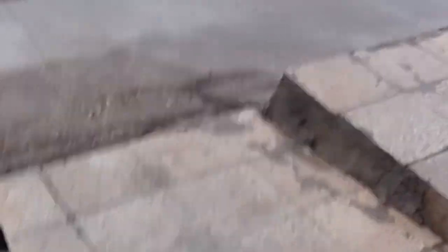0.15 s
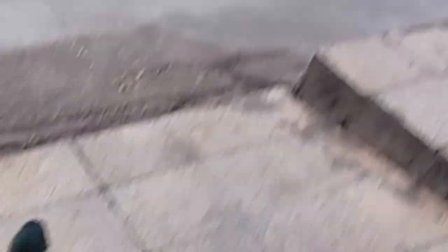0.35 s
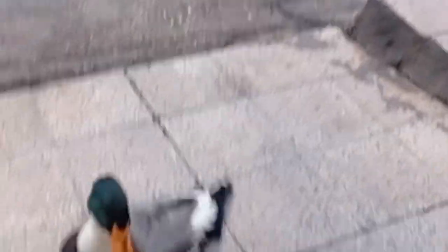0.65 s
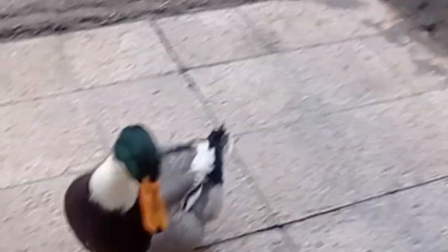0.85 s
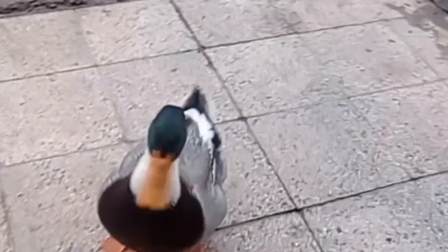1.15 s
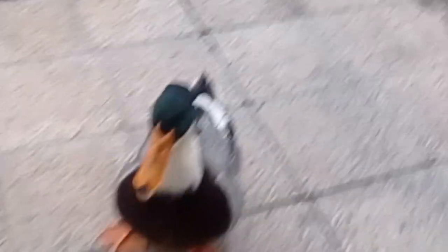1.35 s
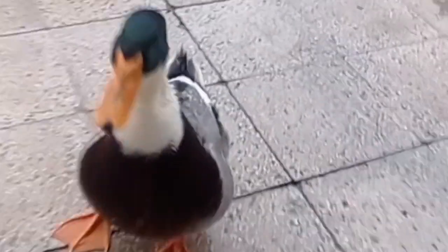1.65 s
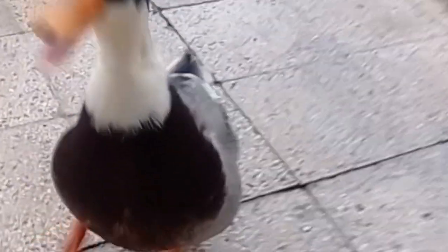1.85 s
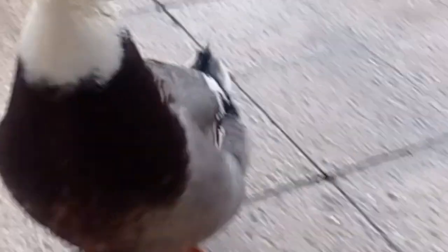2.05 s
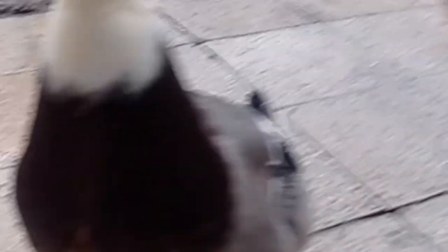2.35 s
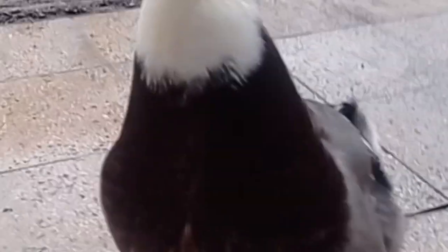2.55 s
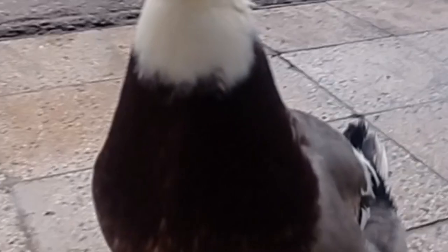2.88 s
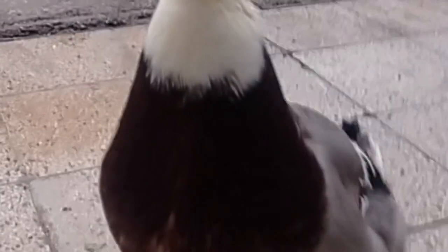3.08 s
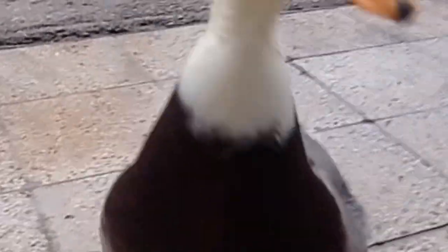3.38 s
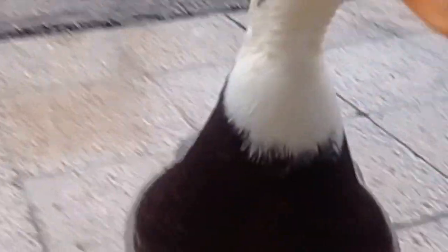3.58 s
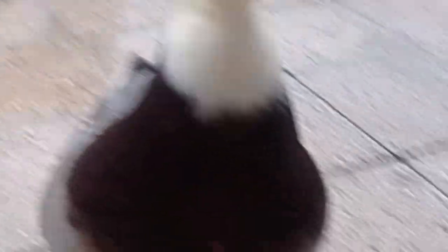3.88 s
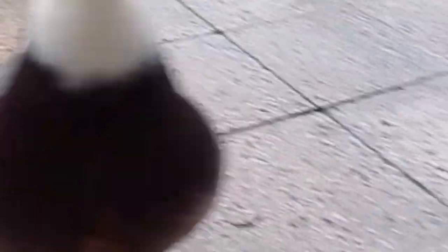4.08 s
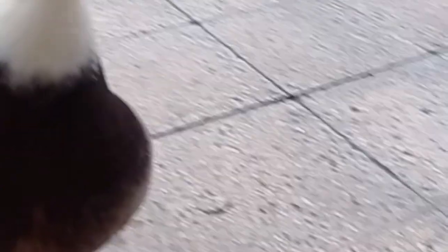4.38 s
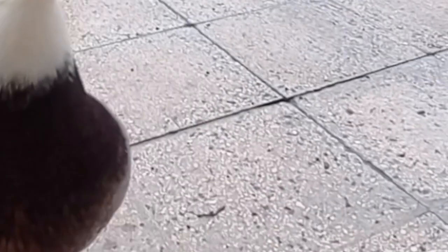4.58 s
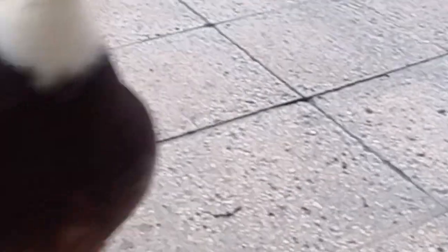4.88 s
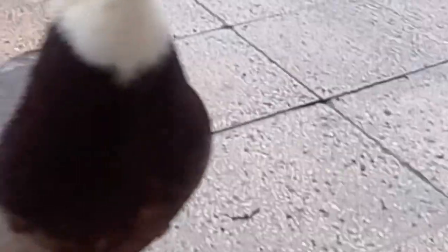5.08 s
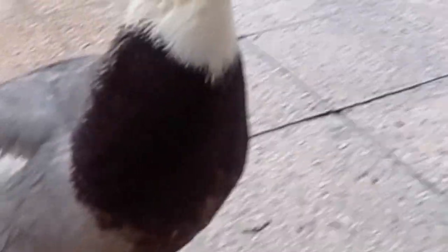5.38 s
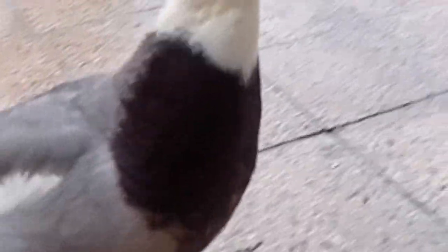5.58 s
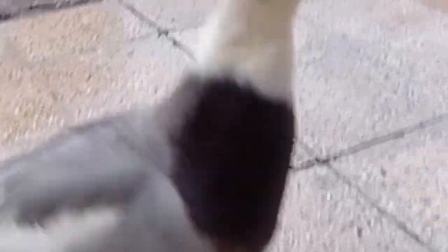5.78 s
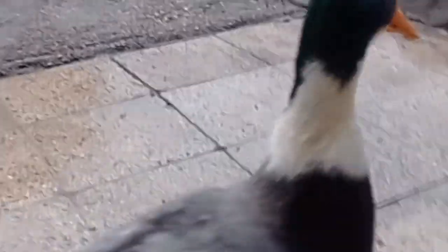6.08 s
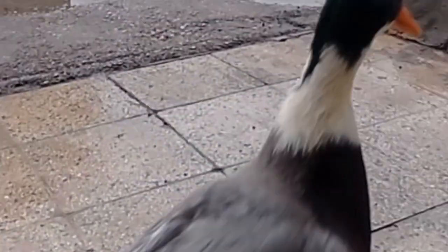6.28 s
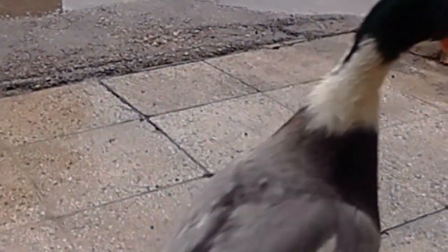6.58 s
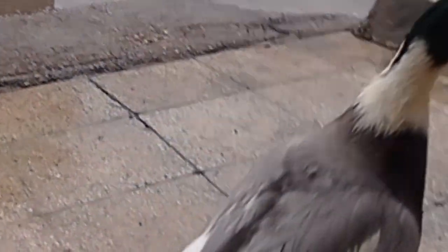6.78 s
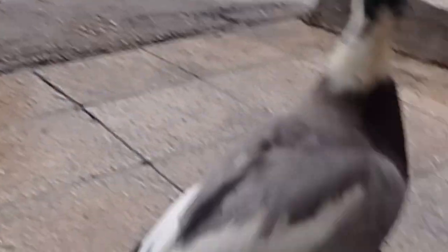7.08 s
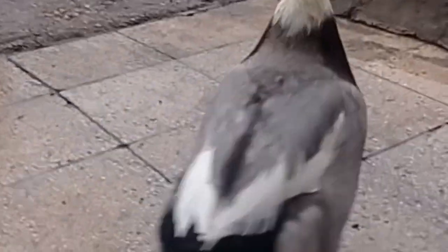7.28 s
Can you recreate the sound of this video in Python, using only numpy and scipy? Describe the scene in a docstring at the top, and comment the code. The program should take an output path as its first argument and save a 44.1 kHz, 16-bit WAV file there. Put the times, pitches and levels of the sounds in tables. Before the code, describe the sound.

A drake rasps short, reedy quacks right up at a hand-held microphone on a paved street, with handling thuds and rumble underneath.

```python
"""Drake quacking in a street

A drake walks up to a hand-held microphone on a paved street, rasping short quacks, many in pairs, then turns away.
Each quack is a reed tone and noise swelling some 60 to 100 times a second, filtered by throat and bill resonances.
Decaying noise makes the bill's wet smacks and light ticks; rumble, rubbing and thuds come from the hand.
Shaped noise gives scuffs, street and a soft high hiss; gliding sines give a far bird; house fronts echo the animals."""
import sys
import numpy as np
from scipy import signal
from scipy.fft import rfft, irfft
from scipy.io import wavfile
from scipy.ndimage import uniform_filter1d, map_coordinates

SR = 44100
rng = np.random.default_rng(int(sys.argv[2]) if len(sys.argv) > 2 else 0)


def output_pcm(signal):
    """Save a mono or channel-first signal as 16-bit PCM at the path in sys.argv[1].

    Samples are clipped to [-1, 1] before scaling.
    """
    pcm = np.clip(np.atleast_2d(signal).T, -1, 1) * 32767
    wavfile.write(sys.argv[1], SR, np.round(pcm).astype(np.int16))


N = 328306
TIME = np.arange(N) / SR
CUTOFF_HZ = 15900   # top of the microphone's band

# Most sources add a trim to their table levels; scuffs and the quack body use theirs directly.
# High hiss that comes and goes: (time [s], level [dB])
HISS_LEVEL = [(0, -66), (.49, -81), (.67, -74), (.76, -63), (1.0, -60), (1.24, -77), (1.4, -64),
              (1.83, -68), (2.2, -60), (2.55, -68), (2.95, -80), (3.45, -87), (4.22, -88), (4.32, -70),
              (4.73, -72), (5.12, -63), (5.4, -84), (7.44, -94)]
# Spectrum of the hiss: (frequency [Hz], level [dB])
HISS_SPECTRUM = [(2000, -14.5), (3400, -13), (5000, -16), (5800, -6), (6700, -5.5), (7600, -10),
                 (9000, -21.5), (10200, -28.5), (13000, -36), (15200, -28)]
# Spectrum of far street noise: (frequency [Hz], level [dB])
STREET_SPECTRUM = [(120, -17.5), (200, -11), (330, -3), (660, -10.5), (1000, -9), (1600, -13.5),
                   (2100, -24.5), (2800, -31.5), (4800, -35), (6000, -38.5), (10000, -52.5), (16000, -62)]

# Hand moving on the case: (time [s], rumble level [dB], rubbing relative to rumble [dB])
HANDLING_LEVEL = [(0.0, -48, 4), (0.04, -46.5, -26), (0.5, -33.5, -11), (0.56, -47.5, -14),
                  (0.66, -36.5, -20), (1.18, -41.5, -17.5), (1.24, -35.5, -10), (1.3, -37.5, -28.5),
                  (1.82, -27, -13), (2.3, -50.5, -11.5), (2.78, -42.5, -10), (2.84, -30, -8.5),
                  (3.29, -45.5, -14.5), (3.56, -30.5, -13), (3.81, -52, -9.5), (3.98, -39, -21.5),
                  (4.25, -46, -24), (4.33, -59.5, -4), (4.66, -44, -19), (5.86, -44, -19), (5.99, -52, -12),
                  (6.98, -40.5, -19.5), (7.27, -55.5, -10.5), (7.44, -45, -22)]
# Hand bumping the microphone: (time [s], thud level [dB], knock relative to thud [dB])
HAND_BUMPS = [(0.128, -29.5, -25), (0.277, -19, -19), (0.444, -19.5, -23), (0.473, -15, -17.5),
              (0.607, -23, -38), (0.739, -20.5, -41), (0.888, -25, -13), (1.223, -16.5, -16),
              (1.237, -14, -28), (1.743, -19.5, -38), (1.775, -20, -28), (1.818, -19.5, -16),
              (1.885, -20, -15), (1.959, -18.5, -12), (2.835, -16, -36), (2.931, -15, -8),
              (3.023, -20.5, -21), (3.057, -17.5, -12.5), (5.652, -29, -24.5), (6.458, -25, -30.5),
              (6.571, -26, -36), (6.891, -23, -47), (6.956, -27, -24), (7.028, -27.5, -37)]
# Spectra of rumble, rubbing and knock: (frequency [Hz], level [dB])
RUMBLE_SPECTRUM = [(30, -19.5), (45, -13.5), (66, 2.5), (100, 3), (150, 3.5), (220, -8), (300, -21)]
RUB_SPECTRUM = [(180, -13.5), (270, 4), (400, -6.5), (600, -20), (900, -22.5), (1500, -28)]
KNOCK_SPECTRUM = [(250, -0.5), (450, -1.0), (750, -16.0)]

# Quacks: (time of first beat [s], length [s], attack [s], level [dB], sag over the call [dB], rasp level [dB],
#          edge level [dB], beat rate [1/s], nominal reed pitch [Hz], mouth resonance [Hz]);
# rasp and edge levels are relative to the body
QUACK_EVENTS = [(0.008, 0.096, 0.005, -42.5, 6, -9.5, -4, 89, 1840, 1700),
                (0.274, 0.1, 0.041, -37, 9.5, -6.5, -6, 68, 1840, 1640),
                (0.358, 0.11, 0.047, -39, 4.5, -18.5, -12.5, 61, 1788, 1630),
                (0.537, 0.097, 0.038, -34.5, 7, -7, -10.5, 83, 1776, 1650),
                (0.953, 0.093, 0.033, -39, 2, -10.5, -11, 77, 1824, 1710),
                (1.097, 0.1, 0.063, -36.5, 1.5, -8, -3.5, 88, 1829, 1720),
                (1.442, 0.11, 0.04, -34, 1.5, -8, -8, 81, 1788, 1680),
                (1.591, 0.093, 0.088, -25.5, 1.5, -5, -4.5, 102, 1786, 1750),
                (1.864, 0.11, 0.032, -27.5, 5, -12.0, -8, 75, 1683, 1720.0),
                (1.98, 0.12, 0.058, -25, -0.5, -8.5, -5.5, 91, 1812, 1764),
                (2.26, 0.1, 0.031, -25, 1, -13.5, -7, 83, 1844, 1725),
                (2.367, 0.13, 0.049, -24.5, 0.0, -13.5, -4.5, 87, 1790, 1785),
                (2.651, 0.22, 0.029, -25, 2, -18.5, -13, 82.5, 1921, 1735),
                (2.824, 0.087, 0.081, -18.5, 1, -13.5, -7, 97, 1883, 1720),
                (3.112, 0.19, 0.024, -32.5, -4, -20.5, -13, 78, 1812, 1620),
                (3.551, 0.094, 0.048, -28.5, -3.5, -18, -11.5, 91.0, 1733, 1630),
                (3.676, 0.1, 0.06, -28, -4.5, -16.5, -8.5, 90, 1804, 1670),
                (4.004, 0.171, 0.065, -23.5, 13.5, -12, -15.5, 66, 1825, 1615),
                (4.371, 0.09, 0.025, -29.5, 0.5, -15.5, -11.5, 76.0, 1833, 1540),
                (4.518, 0.11, 0.036, -28, 0.5, -15, -13.5, 86.5, 1815, 1610.0),
                (4.829, 0.17, 0.024, -30, 0, -16.5, -18, 81, 1820, 1590),
                (5.205, 0.09, 0.036, -27.5, 3.5, -16.5, -20, 77, 1889, 1590),
                (5.326, 0.103, 0.059, -31, 0.0, -15.5, -10, 84, 1793, 1570.0),
                (5.743, 0.19, 0.061, -35.5, 1, -22, -8.5, 76, 1656.0, 1626),
                (6.224, 0.18, 0.046, -34, 15.5, -21.5, -18.5, 65, 1695, 1634),
                (6.731, 0.15, 0.038, -47, -2.5, -31.5, -17.5, 70, 1593, 1610.0),
                (7.259, 0.166, 0.039, -44, 12, -34, -21.5, 72, 1551, 1574)]
# Windpipe resonances, about 600 Hz apart: (frequency [Hz], width [Hz], peak gain [dB])
THROAT_RESONANCES = [(1327, 170, 10.5), (2029, 110, 11), (2555, 120, 12), (3072, 210, 12.5),
                     (3830, 140, 11), (4437, 250, 16), (5080, 210, 13), (5594, 320, 11.5), (6126, 140, 13),
                     (6635, 230, 16), (7250, 260, 12.5), (7860, 180, 14), (8750, 180, 15.5)]
# Spectra of the reedy body, the hard edge and the rasp, before the throat: (frequency [Hz], level [dB])
BODY_SPECTRUM = [(700, -28), (930, 3), (1100, -1.5), (1300, 0.5), (1600, 0), (2000, -1), (2350, -0.5),
                 (2900, -12)]
EDGE_SPECTRUM = [(2150, -12.5), (2450, 4), (2700, -2), (3100, -11.5), (3500, -13.5), (4500, -28)]
RASP_SPECTRUM = [(2700, -13.5), (3500, -2), (4400, -6), (5600, 1), (6500, -4.5), (7400, -8), (8500, -15.5),
                 (10000, -20), (15000, -31)]
# Upper limit of the rasp, highest with the bill at the microphone, lower as the drake turns away:
# (time [s], limit [Hz])
RASP_LIMIT = [(0, 8100), (2.4, 8200), (2.8, 12000), (3.7, 9740), (4.4, 7060), (5.4, 7260), (5.8, 6270),
              (6.3, 6480), (7.3, 5000)]

# Bill smacking open: (time [s], level [dB], treble relative to that [dB])
BILL_SMACKS = [(0.266, -34.5, -7), (0.537, -40, -12), (0.934, -37, -10), (1.437, -28, -11),
               (1.859, -24, -8.5), (2.252, -23.5, -7.5), (2.644, -22, -20.5), (3.106, -22.5, -48.5),
               (3.55, -21, -20), (3.999, -20.5, -16), (4.364, -21, -12.5), (4.821, -23.5, -20.5),
               (5.197, -24.5, -23), (5.733, -33, -38), (6.22, -32.5, -40), (6.72, -48, -32),
               (7.244, -49, -36.5)]
# Spectrum of the crack in a smack: (frequency [Hz], level [dB])
CRACK_SPECTRUM = [(600, -13.5), (950, 4.0), (1500, -3.5), (2500, -15.0), (4000, -17.0)]

# Light ticks: (time [s], level [dB])
TICK_EVENTS = [(0.5467, -50), (0.9353, -41), (1.3037, -39), (1.3724, -44.5), (1.477, -40), (1.519, -39.5),
               (1.8574, -44), (2.0193, -51), (2.116, -46.5), (2.2518, -49.5), (3.1403, -57.5),
               (4.0941, -50.5), (5.8217, -52), (5.9445, -58), (6.1006, -54.5), (6.4707, -62), (7.4043, -52)]
# Spectrum of a tick: (frequency [Hz], level [dB])
TICK_SPECTRUM = [(3000, -3), (5000, -1), (7500, 7.5), (10500, -9), (13000, -13.5), (15300, -1.5)]

# Soft scuffs on the paving: (time of middle [s], length [s], level [dB])
SCUFF_EVENTS = [(0.728, 0.11, -60), (0.906, 0.27, -65), (1.309, 0.047, -55)]
# Spectrum of a scuff: (frequency [Hz], level [dB])
SCUFF_SPECTRUM = [(2200, -5), (2900, 10), (3400, -3), (4000, 4), (5200, -23), (7000, 13.5), (9000, -18)]

# Small bird far away: (time [s], length [s], start pitch [Hz], end pitch [Hz], level [dB])
BIRD_CHIRPS = [(.818, 0.025, 4550, 3900, -53), (6.013, 0.063, 3880, 4000, -71),
               (6.047, 0.067, 4330, 4400, -70.5), (6.146, 0.078, 4500, 3900, -71)]

LEAD_S = 0.0092   # the air flows this long before the first beat
ATTACK_DB = 21.5   # rise of each quack
RELEASE_S, RELEASE_DB = 0.054, 22.5   # time scale and depth of its dying away
RASP_FOLLOWS, RASP_FADE_DB_PER_S = 0.4, 5.5   # the rasp grows with effort and tires through the call
MOUTH_WIDTH_HZ, MOUTH_DB = 150, 9.5
THROAT_SCATTER_PER_KHZ = .002   # share by which resonances stray between quacks; high ones stray more
GAPE_LIFT = .018   # share by which all frequencies rise from shut to open bill


def from_db(db):
    """Amplitude gain is the exponential of a level in decibels."""
    return 10 ** (np.asarray(db) / 20)


def rms_one(x):
    """Normalisation: divide by the root mean square."""
    return x / np.sqrt(np.mean(x ** 2) + 1e-20)


def along(rows, t):
    """Linear interpolation: read each column of a curve at the times t."""
    s, *columns = np.transpose(rows)
    return [np.interp(t, s, column) for column in columns]


def cut(x, hz, kind, order=2):
    """Butterworth filtering: a maximally flat passband."""
    sections = signal.butter(order, hz, kind, fs=SR, output="sos")
    return signal.sosfilt(sections, x + 1e-18)


def colour(x, points):
    """Spectral shaping: weight the Fourier components, with falling skirts outside the points; rms 1."""
    hz, db = np.transpose(points)
    f = np.maximum(np.fft.rfftfreq(len(x), 1 / SR), 1)
    skirts = np.minimum(f / hz[0], 1) ** 3 * np.minimum(hz[-1] / f, 1) ** 3
    gain = from_db(np.interp(np.log(f), np.log(hz), db))
    return rms_one(irfft(rfft(x) * skirts * gain, len(x)))


def noise(points):
    """Stationary noise: white noise shaped to a spectrum."""
    return colour(rng.standard_normal(N), points)


def wander(size, hz):
    """Band-limited random motion: low-passed noise with spread 1."""
    slow = cut(rng.standard_normal(2 * size), hz, "low")
    return rms_one(slow[size:])   # the first half lets the filter settle


def even(x, seconds):
    """Automatic gain: divide by a running rms so that it stays near 1."""
    size = max(int(seconds * SR), 1)
    power = uniform_filter1d(uniform_filter1d(x ** 2, size), size)
    return x / np.sqrt(np.abs(power) + 1e-12)


def resonance(x, hz, width_hz, db):
    """Second-order resonance: a pole and zero pair lifts a band by its peak gain."""
    g, a, c = from_db(db / 2), np.pi * width_hz / SR, -2 * np.cos(2 * np.pi * hz / SR)
    return signal.lfilter([1 + a * g, c, 1 - a * g], [1 + a / g, c, 1 - a / g], x)


def ring(clicks, hz, t60):
    """Damped free vibration: each click starts a sine that falls 60 dB in t60 seconds."""
    r, w = from_db(-60 / (t60 * SR)), 2 * np.pi * hz / SR
    return signal.lfilter([0, np.sin(w)], [1, -2 * r * np.cos(w), r * r], clicks + 1e-18)


def strikes(times, db):
    """Impulsive excitation: one click for each event."""
    out = np.zeros(N)
    out[np.clip(np.round(times * SR).astype(int), 0, N - 1)] = from_db(db)
    return out


def fading(clicks, t60):
    """Exponential decay: an envelope jumps at each click and falls 60 dB in t60 seconds."""
    return signal.lfilter([1], [1, -from_db(-60 / (t60 * SR))], clicks + 1e-18)


def background(hiss_trim_db=-1, street_db=-64.5, flicker_db=3.5):
    """Superposition of steady street noise and a high hiss with random level modulation."""
    level_db, = along(HISS_LEVEL, TIME)
    hiss_gain = from_db(level_db + hiss_trim_db + flicker_db * wander(N, 30))
    hiss = hiss_gain * noise(HISS_SPECTRUM)
    return hiss + from_db(street_db) * noise(STREET_SPECTRUM)


def handling(rumble_trim_db=-2, rub_trim_db=-2, thud_trim_db=-6, knock_trim_db=-6):
    """Contact excitation of the case: friction gives uneven rumble and rubbing, bumps give damped thuds."""
    level_db, rub_rel_db = along(HANDLING_LEVEL, TIME)
    lumps_db = 2.2 * wander(N, 12)
    rumble_gain = from_db(level_db + lumps_db + rumble_trim_db)
    rumble = rumble_gain * even(noise(RUMBLE_SPECTRUM), 0.23)
    rub_gain = from_db(level_db + 2.06 * lumps_db + rub_rel_db + rub_trim_db)
    rub = rub_gain * even(noise(RUB_SPECTRUM), 0.15)
    s, db, knock_rel_db = np.transpose(HAND_BUMPS)
    clicks = strikes(s, db)
    thud = ring(clicks, 104.4, 0.072) - 1.35 * ring(clicks, 204.7, 0.034)
    thud = from_db(thud_trim_db) * cut(thud, 500, "low")
    knock = fading(strikes(s, db + knock_rel_db), 0.066) * noise(KNOCK_SPECTRUM)
    knock = from_db(knock_trim_db) * cut(knock, 1000, "low", order=4)
    return rumble + rub + thud + knock


def effort(t, length_s, attack_s, sag_db):
    """Blowing pressure [dB], t seconds after onset: rounded swell, sagging hold, rounded release."""
    rising = np.maximum(1 - t / max(attack_s, .005), 0)
    falling = np.maximum(1 + (t - LEAD_S - length_s) / RELEASE_S, 0)
    return -ATTACK_DB * rising ** 2 - sag_db * t / length_s - RELEASE_DB * falling ** 2


def syrinx(t, first_s, beats_per_s, reed_hz, swoop=0.2115, swoop_lag=0.092, flutter=.065, stray=0.03793):
    """Joint amplitude and frequency modulation by the beating membranes; gives reed phase and strength."""
    size = len(t)
    rough = np.clip((beats_per_s - 55) / 25, .4, 1.5)   # hurried beats are less regular
    beat = 2 * np.pi * ((t - first_s) * beats_per_s + .1 * rough * wander(size, 60))
    bend = swoop * np.cos(beat - 2 * np.pi * swoop_lag)   # lag in beats
    bend = bend + flutter * wander(size, 600) + stray * wander(size, 69.6)
    phase = 2 * np.pi * np.cumsum(.92 * reed_hz * (1 + bend)) / SR   # rests 8 % below nominal pitch
    swell_db = 5.8 * np.cos(beat) + 1.8 * np.cos(2 * beat) + 1.7 * rough * wander(size, 200)
    return phase, from_db(swell_db)


def throat(x, mouth_hz, strays):
    """Resonances in cascade: mouth, then windpipe, the latter scattered by the given strays."""
    x = resonance(x, mouth_hz, MOUTH_WIDTH_HZ, MOUTH_DB)
    for (hz, width_hz, db), stray in zip(THROAT_RESONANCES, strays):
        scatter = THROAT_SCATTER_PER_KHZ * hz / 1000 * stray
        x = resonance(x, hz * (1 + scatter), width_hz, db)
    return x


def glide(x, shift):
    """Time warping: a varying reading speed scales all frequencies, relative to the mean shift."""
    return map_coordinates(x, [np.cumsum(1 + shift - shift.mean())], order=3)


def quack(row, air_db=-11, overtone_db=-3, edge_trim_db=-2.0, arch=.1):
    """Source and filter: reed tone, hard edge and rasp of overtones and turbulence pass through the throat."""
    (first_s, length_s, attack_s, level_db, sag_db,
     rasp_rel_db, edge_rel_db, beats_per_s, reed_hz, mouth_hz) = row
    start, stop = int((first_s - .018) * SR), int((first_s + length_s + .025) * SR)
    at = np.arange(max(start, 0), min(stop, N))
    t = TIME[at]
    push_db = effort(t - first_s + LEAD_S, length_s, attack_s, sag_db)
    # the bill opens and shuts, lifting tone and resonances
    gape = np.sin(np.linspace(0, np.pi, len(t)))
    phase, swell = syrinx(t, first_s, beats_per_s, reed_hz * (1 + arch * (gape - .8)))

    air = rng.standard_normal((2, len(t)))
    breath = from_db(air_db) * rms_one(cut(air[0], [850, 2600], "band"))
    body = colour(swell * (np.sin(phase) + breath), BODY_SPECTRUM)
    edge = colour(swell ** 0.73 * air[1], EDGE_SPECTRUM)
    overtones = .7 * np.sin(2 * phase) + np.sin(3 * phase) + .5 * np.sin(4 * phase)
    rasp = colour(swell ** .5 * (from_db(overtone_db) * overtones + air[1]), RASP_SPECTRUM)
    limit_hz, = along(RASP_LIMIT, first_s)
    rasp = cut(rasp, min(limit_hz, CUTOFF_HZ), "low", order=5)

    strays = rng.standard_normal(len(THROAT_RESONANCES))
    body, edge, rasp = [even(throat(x, mouth_hz, strays), 2 / beats_per_s) for x in (body, edge, rasp)]
    # the edge grows with the effort
    edge_gain = from_db(edge_trim_db + edge_rel_db + push_db - push_db.max())
    rasp_gain = from_db(rasp_rel_db + RASP_FOLLOWS * push_db - RASP_FADE_DB_PER_S * (t - first_s))
    voice = body + edge_gain * edge + rasp_gain * rasp
    gate = np.interp(t, [t[0], t[0] + .014, t[-1] - .015, t[-1]], [0, 1, 1, 0]) ** 2
    out = np.zeros(N)
    out[at] = gate * from_db(level_db + push_db) * glide(voice, GAPE_LIFT * gape)
    return out


def street_echo(x, t60=0.26, echo_db=-19, wall_cut_hz=2600):
    """Diffuse reflection: convolution with a dull, decaying noise tail stands for the house fronts."""
    t = TIME[:SR]
    build_up = np.minimum(t / .015, 1)
    tail = cut(rng.standard_normal(SR), wall_cut_hz, "low") * from_db(-60 * t / t60) * build_up
    tail = tail / np.sqrt(np.sum(tail ** 2) * SR / (2 * wall_cut_hz))   # unit gain in its passband
    return from_db(echo_db) * signal.fftconvolve(x, tail)[:N]


def bill(crack_trim_db=-9, crack_t60=0.03, spit_trim_db=-6, spit_t60=0.069, opening_s=0.0011):
    """Transient excitation of a cavity: a wet crack, and a treble spit through the windpipe resonances."""
    s, db, treble_db = np.transpose(BILL_SMACKS)
    opening = max(int(opening_s * SR), 1)
    crack_envelope = uniform_filter1d(fading(strikes(s, db), crack_t60), opening)
    crack = crack_envelope * noise(CRACK_SPECTRUM)
    usual_mouth_hz = np.mean(QUACK_EVENTS, axis=0)[-1]
    hollow = rms_one(throat(noise(RASP_SPECTRUM), usual_mouth_hz, np.zeros(len(THROAT_RESONANCES))))
    spit_envelope = uniform_filter1d(fading(strikes(s, db + treble_db), spit_t60), opening)
    spit = spit_envelope * hollow
    smack = from_db(crack_trim_db) * crack + from_db(spit_trim_db) * spit
    # a small, soft, wet contact has little bass or top
    return cut(smack, [520, 8500], "band", order=5)


def ticks(tick_trim_db=-9, t60=0.076, tail_trim_db=-23, tail_t60=.15):
    """Two-stage decay: crisp noise clicks with a weaker, longer scratchy tail."""
    clicks = strikes(*np.transpose(TICK_EVENTS))
    tick = from_db(tick_trim_db) * fading(clicks, t60)
    tail = from_db(tail_trim_db) * fading(clicks, tail_t60)
    return (tick + tail) * noise(TICK_SPECTRUM)


def scuffs(grain_db=2):
    """Sliding friction of feet on stone: noise in short swells with gritty random modulation."""
    swells = np.zeros(N)
    for middle_s, length_s, db in SCUFF_EVENTS:
        arch = np.maximum(1 - (2 * (TIME - middle_s) / length_s) ** 2, 0)
        swells += from_db(db) * arch ** 2
    return swells * from_db(grain_db * wander(N, 150)) * noise(SCUFF_SPECTRUM)


def bird(trim_db=-3):
    """Frequency modulation: thin whistles glide in pitch with a random unsteadiness."""
    out = np.zeros(N)
    for s, length_s, start_hz, end_hz, db in BIRD_CHIRPS:
        u = np.linspace(0, 1, int(length_s * SR))
        hz = (start_hz + (end_hz - start_hz) * u) * (1 + .06 * wander(len(u), 600))
        whistle = np.sin(2 * np.pi * np.cumsum(hz) / SR)
        out[int(s * SR) + np.arange(len(u))] += from_db(db + trim_db) * np.sin(np.pi * u) * whistle
    return out


def scene():
    """Superposition: animal calls with their echo, ticks, scuffs, handling and background."""
    calls = sum(quack(row) for row in QUACK_EVENTS) + bill() + bird()
    return (calls + street_echo(calls) + ticks() + scuffs() + handling() + background())[None]


def record(dry, low_cut_hz=42):
    """Band limitation: the small microphone loses the deepest bass, and the top is cut steeply."""
    steep = signal.ellip(10, .1, 80, CUTOFF_HZ, fs=SR, output="sos")
    return signal.sosfilt(steep, cut(dry, low_cut_hz, "high"))


dry = scene()
out = record(dry)
output_pcm(out)
```